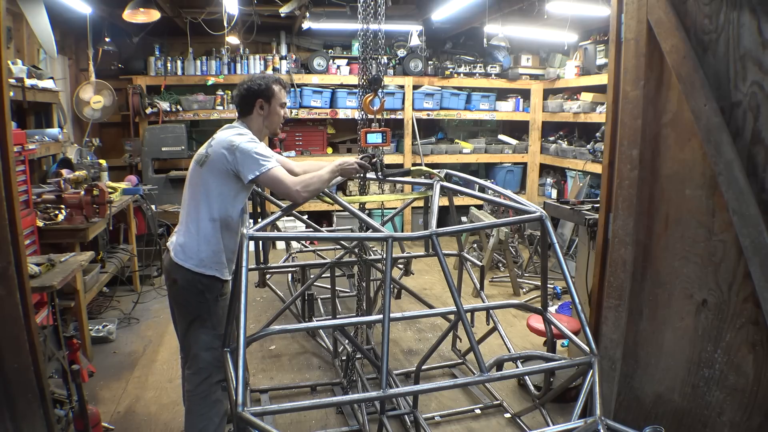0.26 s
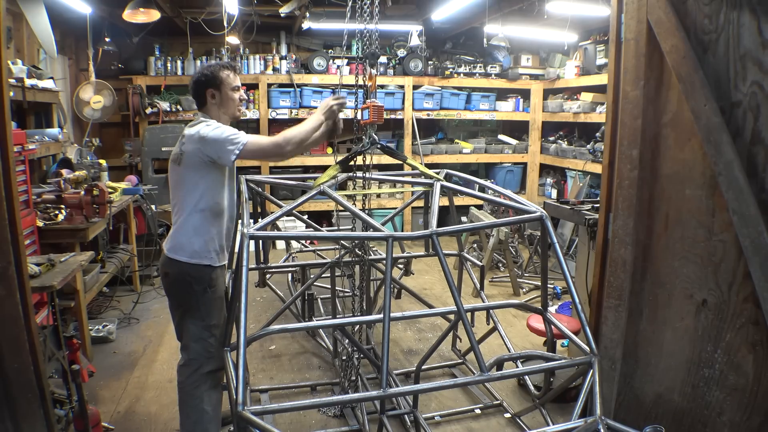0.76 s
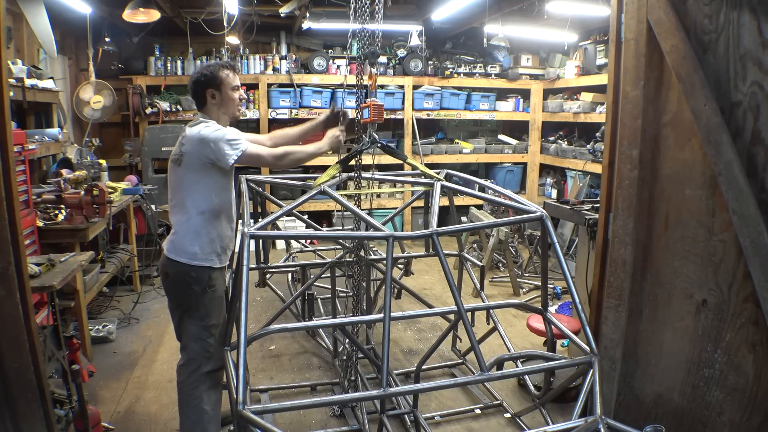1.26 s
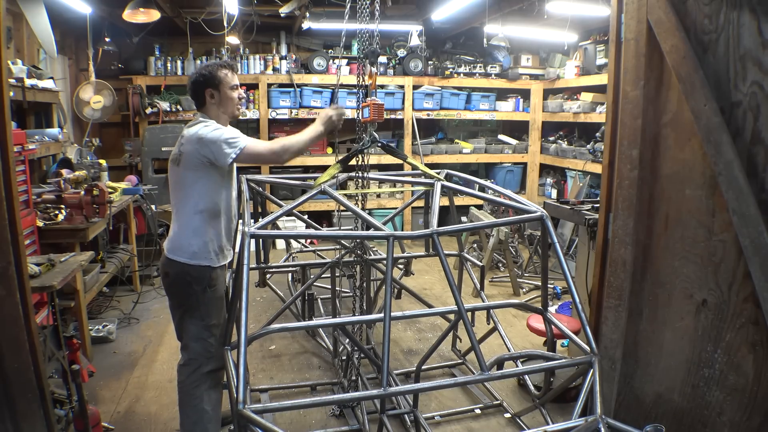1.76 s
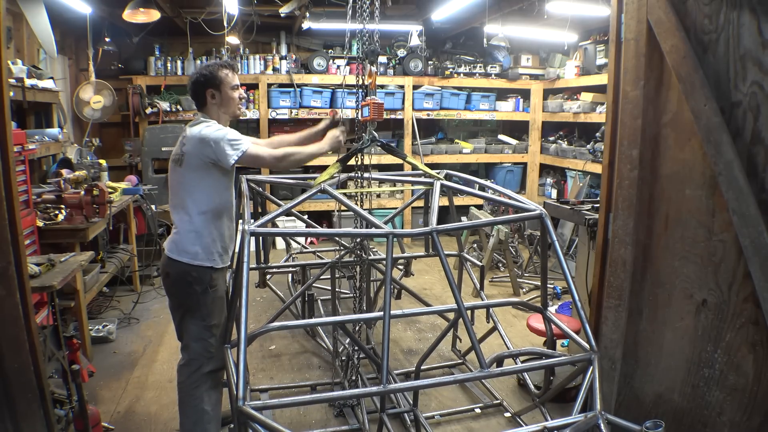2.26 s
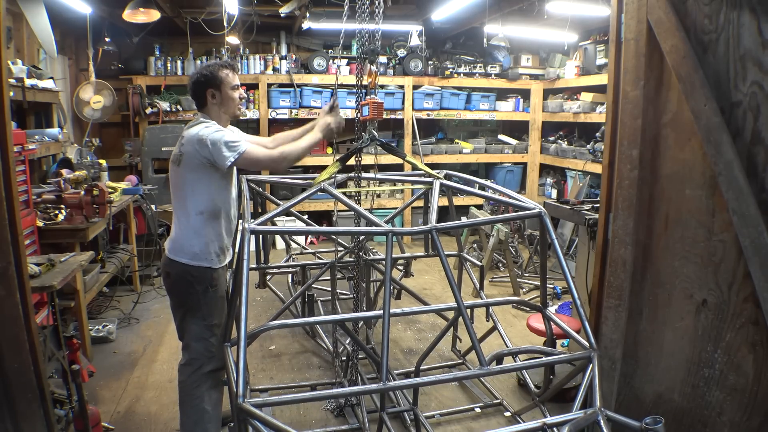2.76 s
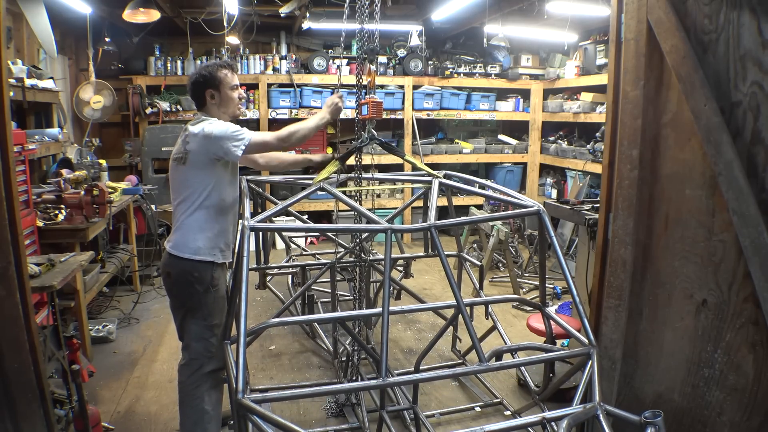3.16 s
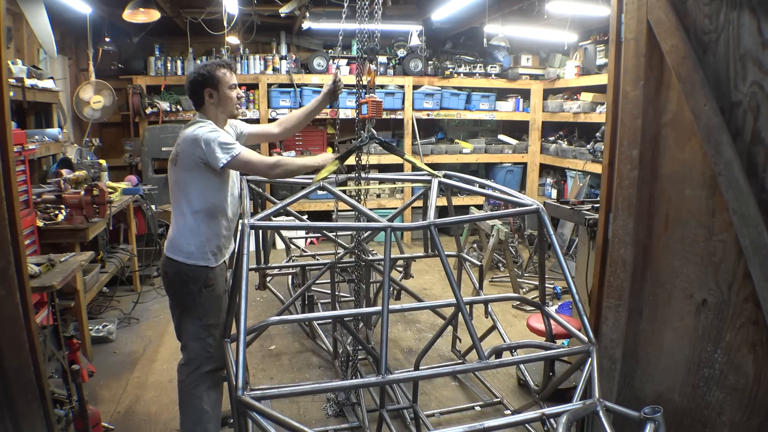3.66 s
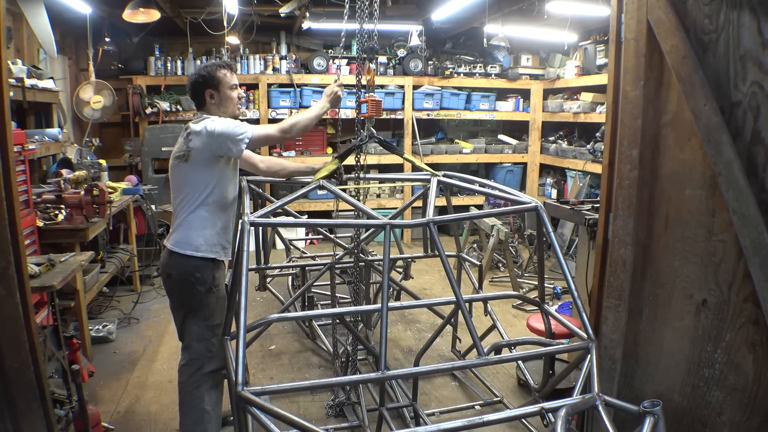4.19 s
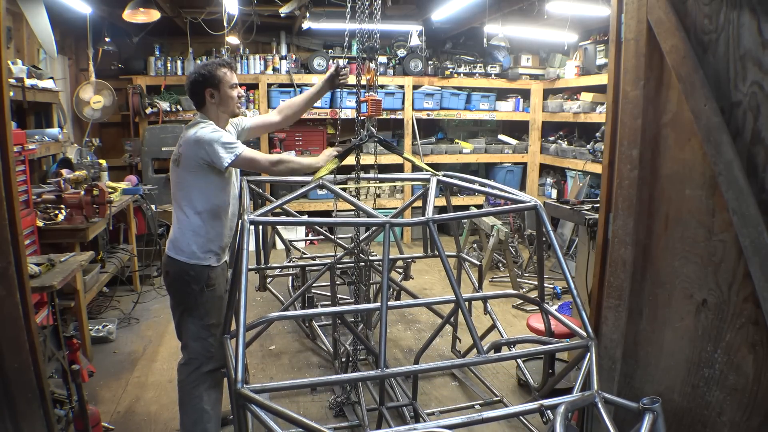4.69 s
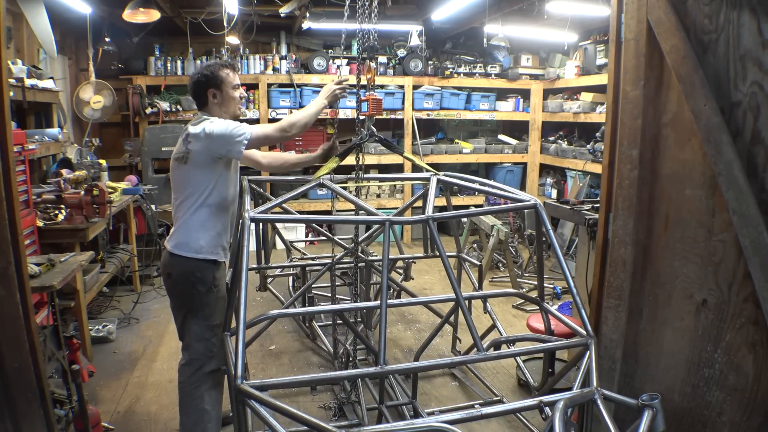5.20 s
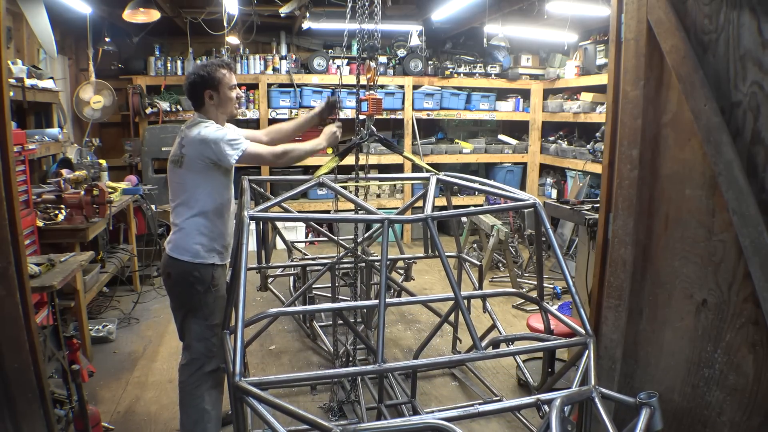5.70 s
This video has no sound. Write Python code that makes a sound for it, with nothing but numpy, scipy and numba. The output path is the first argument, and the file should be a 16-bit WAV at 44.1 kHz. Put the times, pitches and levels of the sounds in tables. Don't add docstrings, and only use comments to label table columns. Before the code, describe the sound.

Quiet room air and a fading metal ring open briefly; suddenly a hand-pulled chain hoist is running. Bright, jingling steel rattle and sharp ratchet snaps continue in uneven surges, with ringing links, scraping slack chain, hollow tube knocks and low thumps under hard pulls. Near the end it slows to separate clicks, then resumes. The workshop gives a diffuse metallic tail; the camera is a few metres away.

```python
import sys
import numpy as np
from scipy import signal
from scipy.fft import rfft, irfft
from scipy.io import wavfile
from scipy.ndimage import uniform_filter1d
from numba import njit

SR = 44100
rng = np.random.default_rng(int(sys.argv[2]) if len(sys.argv) > 2 else 0)


def voltage_ratio(decibels):
    exponent = np.asarray(decibels, float) / 20
    return 10 ** exponent


def store_pcm(level_fs):
    pcm = np.round(np.clip(level_fs, -1, 1) * 32767).astype(np.int16)
    wavfile.write(sys.argv[1], SR, np.atleast_2d(pcm).T)


N = 261954


def level(x, db):
    return x * voltage_ratio(db) / np.sqrt(np.mean(x ** 2))


def curve(table, column):
    rows = np.array(table)
    return np.interp(np.arange(N) / SR, rows[:, 0], rows[:, column])


def colour(x, points):
    hz, db = np.transpose(points)
    bins = np.fft.rfftfreq(x.shape[-1], 1 / SR) + 1
    gain_db = np.interp(np.log(bins), np.log(hz), db)
    return irfft(rfft(x) * voltage_ratio(gain_db), x.shape[-1])


def band(x, lo_hz, hi_hz):
    sos = signal.butter(2, [lo_hz, min(hi_hz, SR / 2.2)], "band", fs=SR, output="sos")
    return signal.sosfilt(sos, x)


@njit
def ring(start, hz, size, t60):
    out = np.zeros(N)
    for k in range(len(start)):
        pole = np.exp(2j * np.pi * hz[k] / SR - np.log(1000) / (t60 * SR))
        z = size[k] + 0j
        for i in range(start[k], min(N, start[k] + int(t60 * SR / 2))):
            z *= pole
            out[i] += z.imag
    return out


def ticks(rows, t60, gain_db, split):
    s, db, hz = np.transpose(rows)
    start = (s * SR).astype(np.int64)
    main = ring(start, hz, voltage_ratio(db + gain_db), t60)
    return main + ring(start, split * hz, voltage_ratio(db + gain_db - 2), t60)


def spread(mid, other):
    # frequency in Hz, side relative to mid in dB.
    side_db = [(60, -7), (150, -9), (260, -15), (400, -23), (700, -20.5), (1300, -14.5), (2400, -17),
               (4800, -16.5), (5500, -9.5), (10500, -7.5), (12500, -9), (16000, -12)]
    # frequency in Hz, lean right of centre in dB.
    lean_db = [(40, -30), (80, -13), (200, -20), (500, -29), (1300, -19.5), (3000, -24), (6000, -28),
               (12000, -50)]
    side = colour(other, side_db) - colour(mid, lean_db)
    return np.array([mid + side, mid - side])


def lull(size=32768):
    # time in seconds, echo level in dB.
    echo_db = [
        (0.0, -37),
        (0.01, -44.5),
        (0.15, -52),
        (0.385, -67),
    ]
    # frequency in Hz, density in dB per Hz.
    echo_colour = [(59, -30), (100, 0), (621, -4), (991, 3), (1910, 2), (3620, -5), (4110, -5), (6420, -3),
                   (7290, -12), (9610, -6), (16000, -35)]
    # frequency in Hz, density in dB per Hz.
    air_colour = [(18, -50), (30, -15), (48, 0), (215, -6.5), (252, -3.5), (364, -10), (702, -9),
                  (1960, -12.5), (8740, -26), (16000, -32)]
    # time in seconds, peak in dB, frequency in Hz.
    faint_ticks = [
        (.202, -48, 6790),
        (.237, -44, 1400),
        (.297, -48, 1000),
        (.325, -48, 950),
    ]
    # time in seconds, level in dB, frequency in Hz.
    clank = [
        (0, -48, 4120),
        (0, -54, 5600),
        (0, -55, 6350),
        (0, -48, 2860),
    ]
    noise = rng.standard_normal((4, size))
    echo = voltage_ratio(curve(echo_db, 1)[:size] - 1.5) * level(colour(noise[:2], echo_colour), 0)
    mid, other = echo + level(colour(noise[2:], air_colour), -54)
    ringing = ticks(faint_ticks, t60=.008, gain_db=0, split=1.2)
    ringing = ringing + ticks(clank, t60=.81, gain_db=-6, split=.52)
    return np.pad(spread(mid + ringing[:size], other), ((0, 0), (0, N - size)))


def hauling():
    # grip in seconds, rattle level in dB, slowing before the next grip in seconds,
    # loss of speed in dB, jolt to the frame in dB.
    pulls = [(0.39, -22.5, 0.16, 6.5, 0), (0.618, -24, 0.041, 0.5, 4), (0.79, -23, 0.13, 1.5, -1),
             (1.24, -23.5, 0.17, 4.5, -2), (1.7, -23.5, 0.057, 5, 0.5), (2.16, -21, 0.087, 1.5, -3),
             (2.3, -24, 0.14, 2.5, 4), (2.54, -23, 0.054, 5.5, -3.5), (2.706, -22.5, 0.22, 2, 2),
             (3.19, -22, 0.19, 4, 0), (3.66, -22.5, 0.067, 1, 0.5), (4.222, -23.5, 0.072, 0, 0.5),
             (4.471, -23, 0.039, 0, -2), (4.72, -25, 0.048, -1, -1.5), (4.88, -22.5, 0.083, 4, 2),
             (5.387, -23.5, 0.1, 16, 3), (5.483, -22, 0.047, 10.5, -2.5), (5.552, -26, 0.028, 5, -2),
             (5.598, -26, 0.033, 1.5, 0.5), (5.635, -23.5, .008, 2, -7), (5.655, -22, 0.061, 1, -0.5)]
    grip_s, jolt_s = .006, .27
    s, db, slowing, loss_db, jolt_db = np.transpose(pulls)
    end = np.append(s[1:], N / SR)
    t = np.arange(N) / SR
    knots = np.array([s + grip_s, end - slowing, end]).T.ravel()
    pull_db = np.interp(t, knots, np.repeat(db, 3))
    speed_db = np.interp(t, knots, np.outer(-loss_db, [0, 0, 1]).ravel())
    pull = np.maximum(np.searchsorted(s, t) - 1, 0)
    jolt = jolt_db[pull] * np.exp(-((t - s[pull]) / jolt_s) ** 2)
    return pull_db, speed_db, jolt


def knocks(rate, spread_db):
    hit, sign, size = rng.random((3, N))
    return (hit < rate / SR) * np.sign(sign - .5) * voltage_ratio(-spread_db * np.log(size + 1e-4))


def steel(families, t60, rate, spread_db, patchy_db, dwell_s):
    knocked = []
    for hz, width, db in families:
        when, pick, size = rng.random((900, 3))[:int(rate * N / SR)].T
        pitch, patch = rng.standard_normal((2, 3, 200))
        link = (pick * 3).astype(int)
        turn = (when * N / SR / dwell_s + link / 3).astype(int) % 200
        blow_db = db + patchy_db * patch[link, turn] - spread_db * np.log(size + .016)
        knocked.append([when * N, hz + width / 2 * pitch[link, turn], voltage_ratio(blow_db)])
    start, hz, size = np.hstack(knocked)
    return level(ring(start.astype(np.int64), hz, size, t60), 0)


def shell(clatter, rings, width_hz, patchy_db, change_s):
    steps = rng.standard_normal((len(rings), 100))
    t = np.arange(N) / SR / change_s
    total = 0
    for (hz, db), step in zip(rings, steps):
        swell_db = patchy_db * np.interp(t, np.arange(100), step)
        tone = level(band(clatter, hz - width_hz / 2, hz + width_hz / 2), 0)
        total = total + voltage_ratio(db + swell_db) * tone
    return level(total, 0)


def casing(clatter, speed_db):
    # frequency in Hz, width in Hz, level in dB.
    modes = [(1474, 200, -2), (1692, 116, -0.5), (1936, 115, 0.5), (2390, 61, -4), (2857, 45, -1),
             (3200, 130, -2), (3430, 35, -22), (3720, 250, -2), (4077, 126, 2), (4176, 48, -4),
             (4380, 61, -2.5), (4930, 250, -5)]
    # steady ring in Hz, level in dB.
    rings = [(2379, -46), (2880, -45.5), (3187, -46.5), (3900, -46), (4040, -47.5), (4156, -43),
             (4856, -41), (4945, -38.5), (6457, -41), (7506, -44), (7947, -41)]
    modal = steel(modes, t60=.026, rate=90, spread_db=2.5, patchy_db=2, dwell_s=.12)
    body = level(band(clatter, 1534, 4420), -3.5) + voltage_ratio(-4.5) * modal
    body = body + voltage_ratio(-10) * shell(clatter, rings, width_hz=56, patchy_db=2, change_s=.12)
    return body - (1 - voltage_ratio(.85 * speed_db)) * band(body, 2300, 8400)


def links(clatter):
    # frequency in Hz, width in Hz, level in dB.
    modes = [(5640, 78, -10), (5660, 130, 4), (5790, 110, -1), (5940, 210, 1), (6200, 120, 4),
             (6640, 270, -11.5)]
    modal = steel(modes, t60=.038, rate=120, spread_db=3, patchy_db=2.5, dwell_s=.14)
    return level(band(clatter, 5620, 6500), -4.5) + voltage_ratio(-13.5) * modal


def wheel(clatter):
    # frequency in Hz, width in Hz, level in dB.
    modes = [(6760, 160, -7), (7160, 71, -8), (7480, 60, -14.5), (7760, 56, -19), (7970, 82, -12.5),
             (8330, 270, -6), (8630, 150, -6)]
    modal = steel(modes, t60=.039, rate=75, spread_db=1, patchy_db=1.5, dwell_s=.14)
    return level(band(clatter, 7000, 8100), -5) + voltage_ratio(-6) * modal


def slack_strand(clatter):
    # frequency in Hz, width in Hz, level in dB.
    modes = [(8760, 230, 5.5), (9480, 99, 2), (9300, 130, 1), (10200, 180, -5.5), (10050, 220, -4),
             (10640, 210, 0.5)]
    modal = steel(modes, t60=.067, rate=87, spread_db=2, patchy_db=-3, dwell_s=.13)
    return level(band(clatter, 9400, 11370), -2.9) + voltage_ratio(-4) * modal


def frame(clatter):
    # frequency in Hz, width in Hz, level in dB.
    modes = [(374, 35, -13.5), (534, 48, -7.5), (827, 24, -5.5), (915, 38, -7.5), (1010, 49, -12.5),
             (1120, 77, -3.5), (1256, 51, -15.5)]
    # steady ring in Hz, level in dB.
    tubes = [(843, -43), (912, -39.5)]
    modal = steel(modes, t60=.046, rate=80, spread_db=2.5, patchy_db=2, dwell_s=.16)
    body = level(band(clatter, 312, 1057), -.59) + voltage_ratio(-5) * modal
    return body + voltage_ratio(-16) * shell(clatter, tubes, width_hz=40, patchy_db=6, change_s=.09)


def heaves():
    # start in seconds, length in seconds, level in dB.
    shakes = [
        (0.377, 0.087, -38),
        (0.646, 0.14, -47),
        (1.38, 0.15, -56),
        (1.98, 0.18, -42),
        (2.274, 0.25, -38.5),
        (2.882, 0.2, -41),
        (3.395, 0.54, -47),
        (4.098, 0.77, -52.5),
        (4.982, 0.54, -42.5),
        (5.72, 0.27, -41),
    ]
    rest_db, swell_s = -48.5, .03
    t = np.arange(N) / SR
    shake = sum(voltage_ratio(db) * ((t > s) & (t < s + length)) for s, length, db in shakes)
    return voltage_ratio(rest_db) + uniform_filter1d(shake, int(swell_s * SR))


def chain():
    # frequency in Hz, density in dB per Hz.
    clatter_colour = [(30, -39), (110, -13.5), (245, -22), (440, -9), (910, 5.5), (1280, 8.5), (1700, 6.5),
                      (2900, 4), (4650, 2), (5900, -1.5), (8000, -5.5), (10500, -7), (12200, -5.5),
                      (16000, -11)]
    # time in seconds, tautness in dB.
    tension = [(0.4, 0.5), (0.74, 1), (0.86, 3.5), (1.15, 1.5), (1.33, 2.5), (1.58, 5), (1.7, -1),
               (2.05, 1.5), (2.3, -1), (2.5, -0.5), (2.76, 0.5), (3.02, 3), (3.45, 2), (3.7, -2.5),
               (3.95, 2.5), (4.8, -0.5), (5.3, 2.5), (5.94, -2.5)]
    clatter = colour(knocks(rate=4000, spread_db=2.5), clatter_colour)
    pull_db, speed_db, jolt_db = hauling()
    tension_db = curve(tension, column=1)
    taut_db = tension_db + .25 * speed_db
    slack_db = -5 + .12 * tension_db + 1.5 * speed_db
    frame_db = -7 - .49 * tension_db - .22 * speed_db + jolt_db
    wheel_db = .51 * taut_db + .48 * slack_db
    hiss_db = .22 * slack_db + .44 * speed_db
    parts = casing(clatter, speed_db) + voltage_ratio(taut_db) * links(clatter)
    parts = parts + voltage_ratio(slack_db) * slack_strand(clatter) + voltage_ratio(frame_db) * frame(clatter)
    hiss = level(band(clatter, 11700, 24000), -11.5)
    parts = parts + voltage_ratio(wheel_db) * wheel(clatter) + voltage_ratio(hiss_db) * hiss
    rumble = level(band(band(clatter, 57, 320), 79, 476), -.37) * heaves()
    return voltage_ratio(pull_db + speed_db) * parts + rumble


def blows(rows, length_s):
    train = np.zeros(N)
    for s, db in rows:
        train[min(int(s * SR), N - 1)] += voltage_ratio(db)
    fade = np.exp(-np.arange(4096) / (length_s * SR))
    return signal.fftconvolve(train, fade)[:N] * rng.standard_normal(N)


def pawl():
    # time in seconds, peak in dB.
    clear_drops = [(0.4228, -24), (0.4524, -14.5), (0.5654, -19), (0.622, -16), (0.659, -26),
                   (0.6906, -13.5), (0.789, -13), (1.189, -16), (1.2364, -12), (1.6574, -18),
                   (1.6930, -17.5), (2.13, -33), (2.16, -14), (2.314, -13), (2.507, -17), (2.7061, -19),
                   (2.737, -13), (3.0159, -12.5), (3.194, -14), (3.5656, -34), (3.6045, -20),
                   (3.6637, -12.5), (4.474, -13), (4.6422, -20), (4.8808, -17), (5.387, -24), (5.484, -21),
                   (5.551, -18), (5.597, -15), (5.636, -14.5), (0.4886, -18), (0.7176, -22), (0.7665, -16),
                   (1.13, -14), (1.214, -19), (2.065, -20), (2.4342, -18), (2.4567, -18), (2.4811, -17),
                   (2.539, -14), (2.6662, -19), (2.763, -20), (2.83, -15), (3.1316, -17), (3.1635, -16),
                   (3.2708, -16), (3.7123, -18), (3.7482, -14), (3.806, -15), (4.3144, -12.5),
                   (4.3948, -19), (4.506, -14), (4.6013, -19), (4.8462, -17), (4.9674, -15.5),
                   (5.0163, -16.5), (5.0553, -16), (5.7931, -19), (5.842, -13), (5.8669, -21.5)]
    # frequency in Hz, level in dB.
    click_colour = [(600, -20), (2000, -13), (5000, 8.5), (8000, 11), (12000, 5), (16000, -11)]
    teeth_per_s, tooth_db, scatter_db = 42, -19.5, 3
    creep_start_s, creep_end_s = 5.33, 5.655
    speed_db = hauling()[1]
    slip, size = rng.standard_normal((400, 2)).T
    turned = np.cumsum(teeth_per_s * voltage_ratio(1.5 * speed_db)) / SR
    at = np.interp(np.arange(400) + .15 * slip, turned, np.arange(N)).astype(int)
    gap_s = np.abs(at[:, None] / SR - np.array(clear_drops)[:, 0]).min(axis=1)
    free = gap_s > .016
    free &= (at < creep_start_s * SR) | (at > creep_end_s * SR)
    at, size = at[free], size[free]
    peak_db = tooth_db + scatter_db * size + 2.9 * speed_db[at]
    teeth = clear_drops + list(zip(at / SR, peak_db))
    snap = blows(teeth, length_s=.0011) + blows(teeth, length_s=.016)
    spray = band(blows([(s, .35 * db) for s, db in teeth], length_s=.0061), 9000, 17000)
    return voltage_ratio(-10) * colour(snap, click_colour) + voltage_ratio(-17.5) * spray


def restrike(rows, t60, gain_db, wobble, count):
    s, length, hz, db = np.array(rows).T[:, :, None]
    when, tune, size = np.moveaxis(rng.random((len(rows), count, 3)), 2, 0)
    start = ((s + length * when ** 1.3) * SR).astype(np.int64)
    blow = voltage_ratio(db + gain_db + 10 * np.log10(length) + 4 * size)
    pitch = hz * (1 + wobble * (tune - .5))
    return ring(start.ravel(), pitch.ravel(), blow.ravel(), t60)


def dwells():
    # start in seconds, length in seconds, frequency in Hz, level in dB.
    held_modes = [(0.6, 0.16, 844, -32.5), (0.8, 0.2, 2850, -28), (0.83, 0.1, 3190, -26),
                  (0.84, 0.14, 4850, -26), (0.97, 0.08, 3195, -25), (1.001, 0.29, 4930, -26),
                  (1.44, 0.05, 3170, -27), (1.77, 0.06, 4200, -27), (1.301, 0.14, 4020, -28),
                  (1.395, 0.05, 2394, -19.5), (1.67, 0.1, 854, -33), (1.877, 0.14, 7860, -27),
                  (2.17, 0.1, 1940, -38), (2.148, 0.078, 7160, -23), (2.155, 0.14, 4930, -28),
                  (2.54, 0.1, 3930, -22), (2.8, 0.07, 4050, -32), (2.89, 0.08, 930, -29),
                  (3.03, 0.17, 1950, -31), (3.28, 0.13, 2446, -25), (3.36, 0.15, 4900, -30),
                  (3.14, 0.12, 2860, -28), (3.37, 0.18, 2860, -26), (3.655, 0.13, 4970, -26.5),
                  (3.82, 0.08, 2400, -26.5), (3.82, 0.09, 4150, -26), (3.7, 0.12, 880, -29.5),
                  (3.75, 0.45, 2900, -30), (1.38, 0.12, 2810, -28), (4.234, 0.54, 4947, -30.5),
                  (4.25, 0.62, 2885, -29.5), (4.455, 0.29, 6460, -25), (4.69, 0.096, 2430, -27),
                  (4.455, 0.3, 2393, -33), (1.05, 0.2, 3190, -30), (5.05, 0.05, 3190, -26),
                  (2.7, 0.2, 847, -30.5), (4.74, 0.1, 4115, -24.5), (4.87, 0.14, 1006, -32),
                  (5.09, 0.12, 4170, -29.5), (5.26, 0.1, 1673, -27.5), (5.66, 0.25, 2880, -27),
                  (1.24, 0.062, 3450, -26), (4.0, 0.1, 4910, -28), (4.18, 0.1, 3960, -29),
                  (5.655, 0.05, 3200, -26.5), (5.67, 0.08, 4940, -26)]
    return restrike(held_modes, t60=.068, gain_db=7, wobble=.013, count=20)


def loose_knocks():
    # time in seconds, peak in dB, frequency in Hz.
    hits = [(0.798, -9, 2400), (1.297, -24, 1167), (1.845, -12.5, 1120), (1.994, -11, 1380),
            (2.136, -9, 1880), (2.159, -12, 1970), (2.202, -33, 1876), (2.208, -24.5, 1950),
            (2.274, -11, 925), (2.356, -12, 1470), (2.364, -10, 883), (2.416, -15, 1384), (2.47, -18, 2030),
            (2.491, -17, 970), (3.621, -13, 1705), (3.8, -25, 845), (3.869, -13, 2540), (4.131, -15.5, 852),
            (4.636, -12, 1670), (5.177, -8, 1292), (5.186, -9, 1750), (5.419, -13.5, 1820),
            (5.657, -10, 2390), (5.663, -10.5, 3100), (3.822, -14, 2400), (5.77, -10.5, 1360),
            (5.901, -12, 915)]
    crack = band(blows([row[:2] for row in hits], length_s=.0043), 790, 3500)
    return ticks(hits, t60=.021, gain_db=-3.5, split=1.36) + voltage_ratio(-.5) * crack


def chatters():
    # start in seconds, length in seconds, frequency in Hz, level in dB.
    clusters = [(0.84, 0.12, 5630, -23), (1.0, 0.16, 5790, -21), (1.025, 0.07, 6100, -21),
                (1.241, 0.26, 5670, -24), (1.308, 0.068, 6200, -18), (1.41, 0.05, 8600, -21),
                (1.5, 0.13, 5790, -23), (1.53, 0.08, 6230, -21), (1.89, 0.22, 5590, -21.5),
                (2.03, 0.07, 6100, -22), (2.165, 0.07, 6150, -22), (2.73, 0.06, 5790, -19.5),
                (2.86, 0.22, 5680, -20), (3.08, 0.1, 5700, -25.5), (3.2, 0.12, 6180, -23),
                (3.32, 0.13, 6040, -23), (3.42, 0.13, 5620, -27), (3.85, 0.12, 6030, -23.5),
                (3.9, 0.07, 5660, -23), (4.0, 0.13, 5650, -23), (4.08, 0.27, 6090, -22),
                (4.46, 0.2, 5730, -27), (4.65, 0.1, 5750, -22), (4.86, 0.14, 5700, -24.5),
                (4.88, 0.08, 6070, -24), (5.05, 0.1, 6230, -27), (5.22, 0.13, 5670, -23),
                (5.28, 0.08, 5950, -21), (5.5, 0.06, 6000, -28), (5.68, 0.08, 5940, -22),
                (5.82, 0.1, 5920, -25.5), (5.23, 0.11, 6180, -27), (4.2, 0.12, 5600, -25.5),
                (4.46, 0.14, 6080, -27), (2.95, 0.15, 5860, -21), (1.19, 0.027, 5710, -26)]
    return restrike(clusters, t60=.054, gain_db=6, wobble=.025, count=30)


def scrapes():
    # start in seconds, length in seconds, level in dB.
    drags = [
        (2.537, 0.1, -21.5),
        (2.737, 0.075, -28),
        (3.187, 0.16, -27),
        (4.725, 0.051, -22.5),
    ]
    t = np.arange(N) / SR
    force = 0
    for s, length, db in drags:
        force = force + voltage_ratio(db) * (t > s) * np.exp(-np.clip((t - s) / length, 0, 9) ** 3)
    grit = knocks(rate=2300, spread_db=6)
    return force * level(band(band(grit, 8400, 10600), 9200, 10300), 0)


def garage(x, wet_db, shift_s):
    # frequency in Hz, T60 in seconds.
    room_t60 = [(110, 0.28), (300, 0.52), (2000, 0.92), (6000, 0.55), (14000, 0.59)]
    t = np.arange(24576) / SR
    hz, t60 = np.transpose(room_t60)
    tail = 0
    for centre in 60 * 2 ** np.arange(0, 8.5, .5):
        fade = np.exp(-np.log(1000) * t / np.interp(np.log(centre), np.log(hz), t60))
        noise = rng.standard_normal((3, len(t)))
        tail = tail + fade * band(noise, centre / 2 ** .25, centre * 2 ** .25)
    tail = tail * np.clip(t / .0012, 0, 1) / np.sqrt(np.sum(tail[0] ** 2))
    turn = np.pi * np.arange(N) / SR / shift_s
    sends = np.array([x * np.cos(turn), x * np.sin(turn), x])
    near, far, side = signal.oaconvolve(sends, tail, axes=1)[:, :N]
    return spread(x + voltage_ratio(wet_db) * (near + far), voltage_ratio(-1.5) * side)


def scene():
    cut_s, fade_s = .394, .00063
    steelwork = chain() + pawl() + dwells() + loose_knocks() + chatters() + scrapes()
    hoist = garage(steelwork, wet_db=-3.5, shift_s=1.299)
    after = np.clip((np.arange(N) / SR - cut_s) / fade_s, 0, 1)
    return after * hoist + (1 - after) * lull()


def roll_off(x):
    return signal.sosfilt(signal.butter(12, 16860, fs=SR, output="sos"), x)


def record(dry):
    top = signal.ellip(14, .3, 80, 15760, fs=SR, output="sos")
    bottom = signal.butter(1, 60, "high", fs=SR, output="sos")
    rounded = np.tanh(1.54 * dry) / 1.53
    return roll_off(signal.sosfilt(np.vstack([top, bottom]), rounded))


dry = scene()
out = record(dry)
store_pcm(out)
```